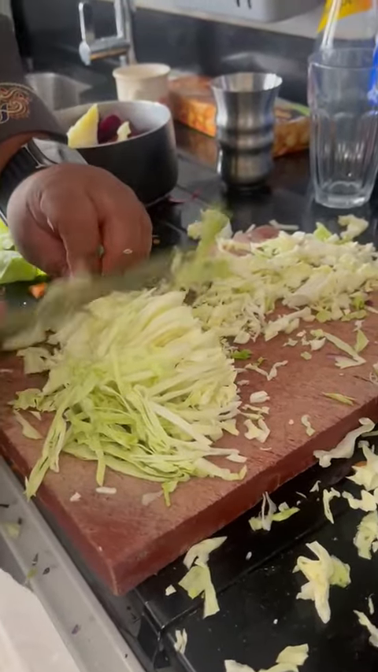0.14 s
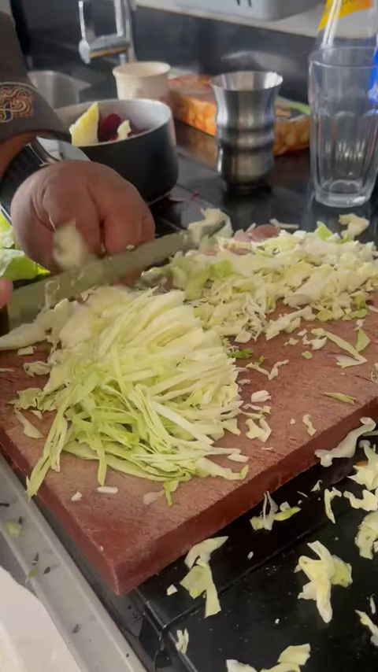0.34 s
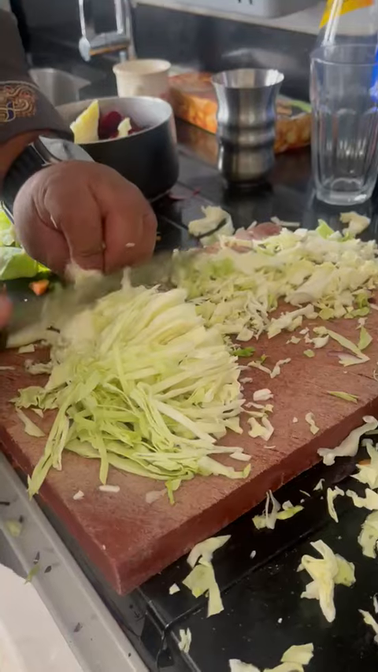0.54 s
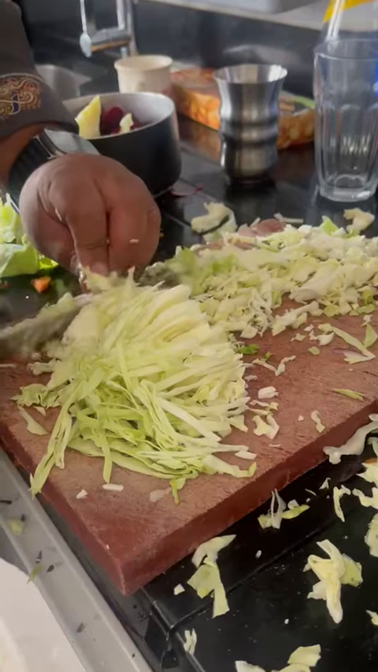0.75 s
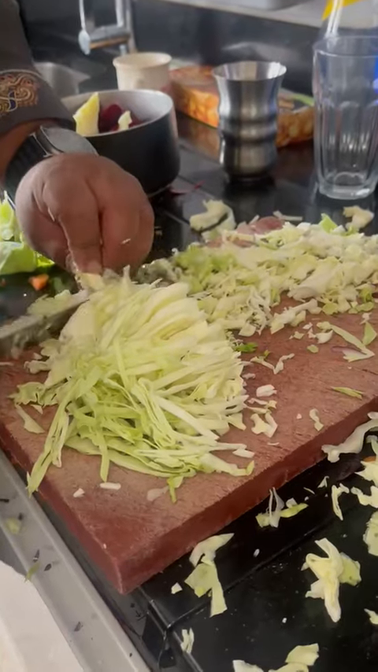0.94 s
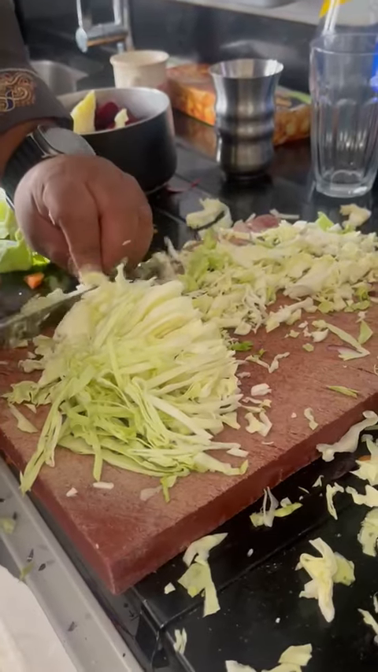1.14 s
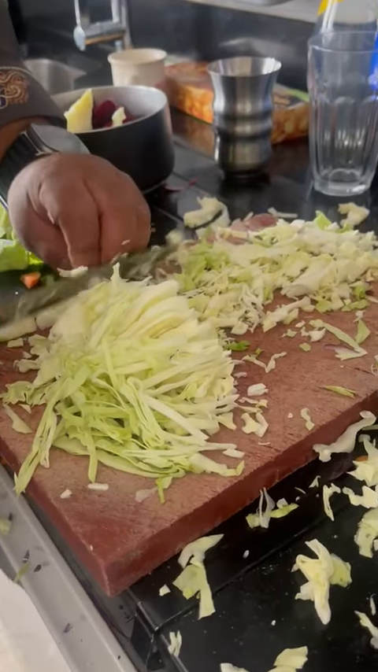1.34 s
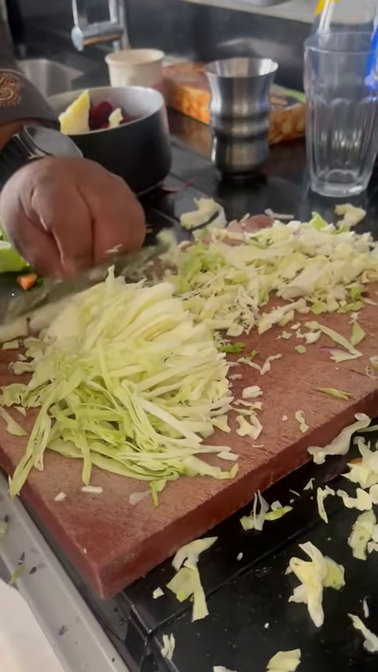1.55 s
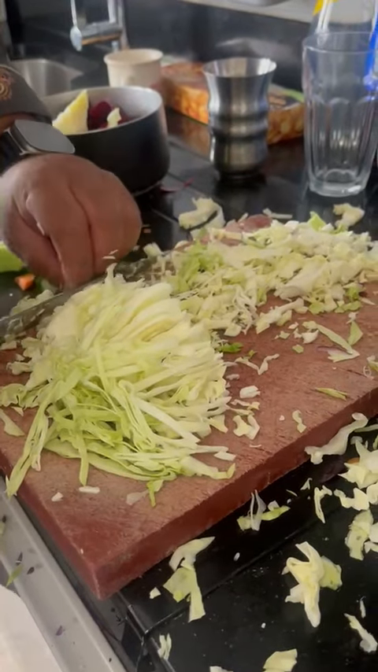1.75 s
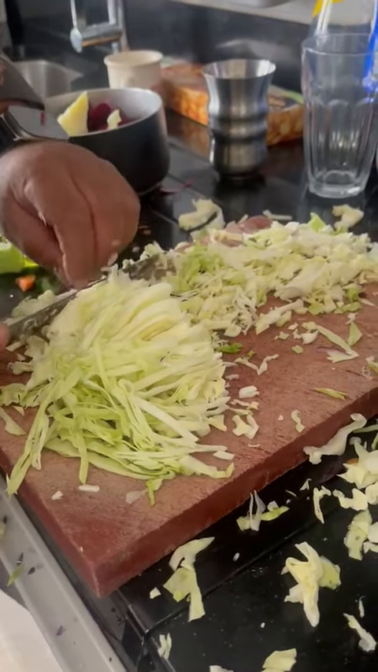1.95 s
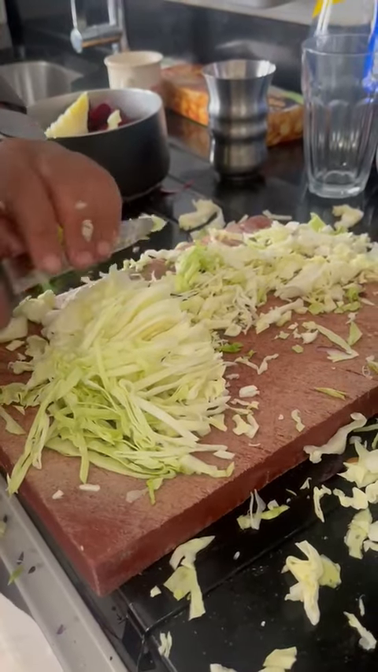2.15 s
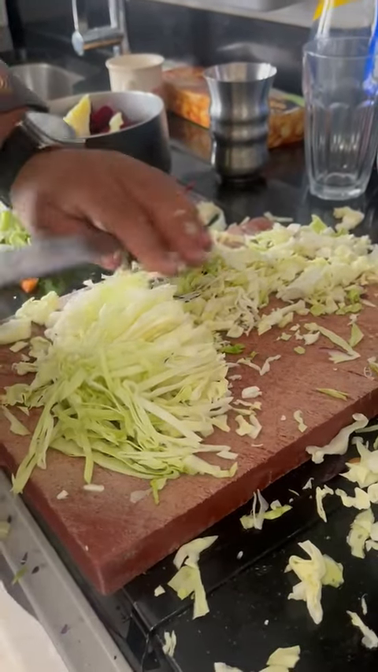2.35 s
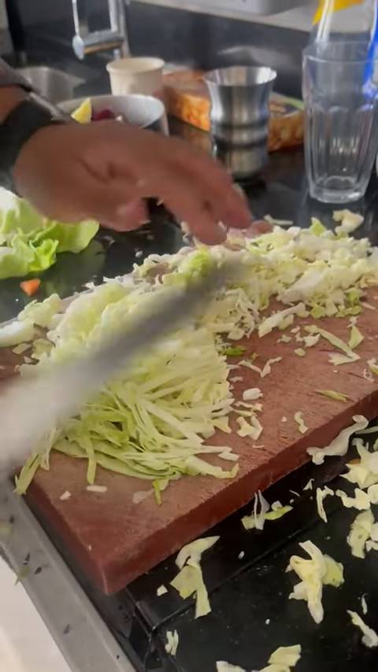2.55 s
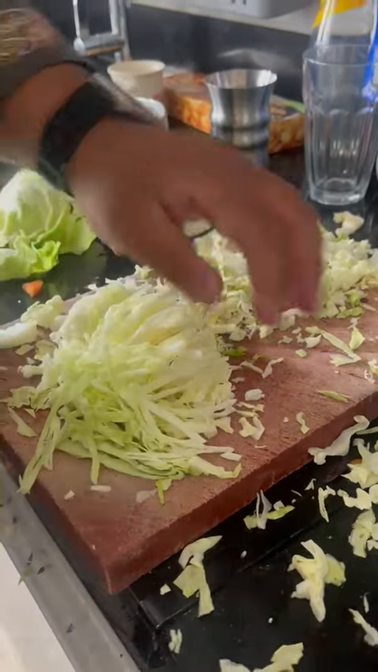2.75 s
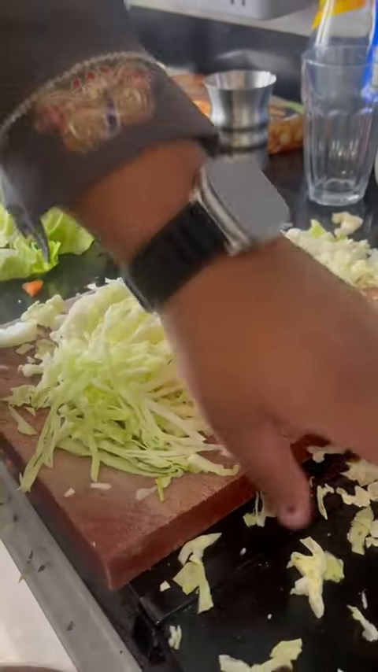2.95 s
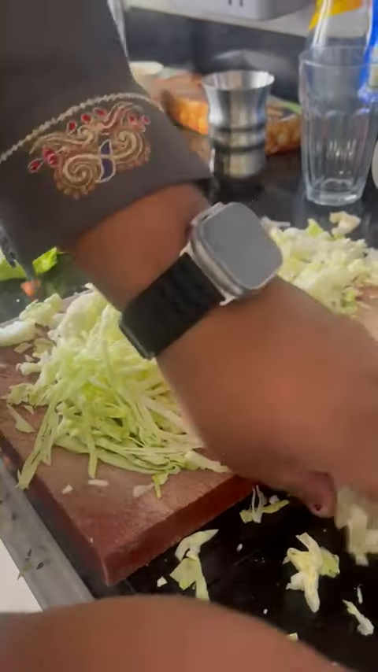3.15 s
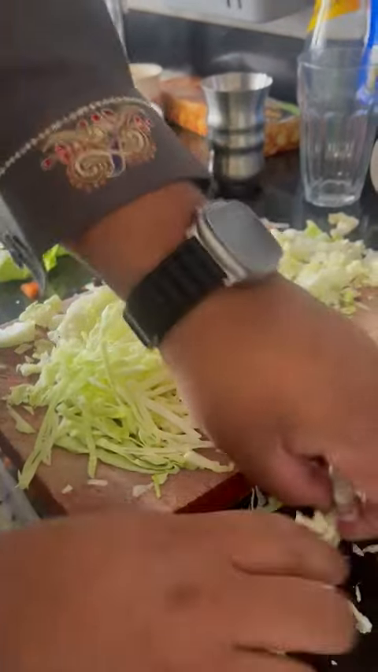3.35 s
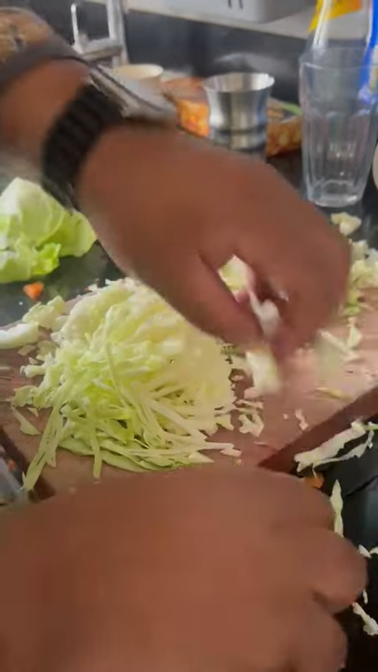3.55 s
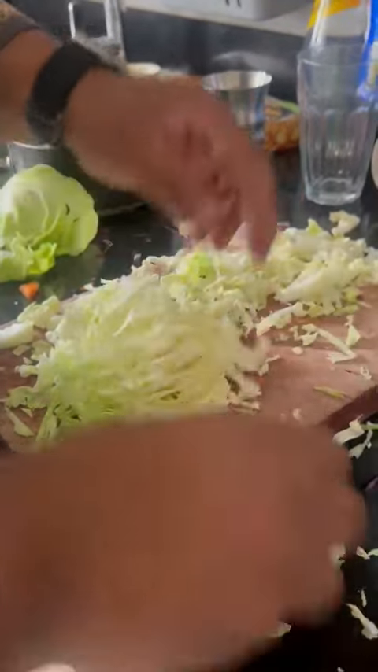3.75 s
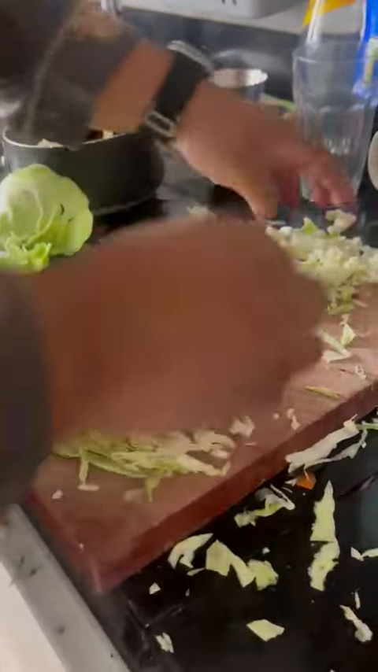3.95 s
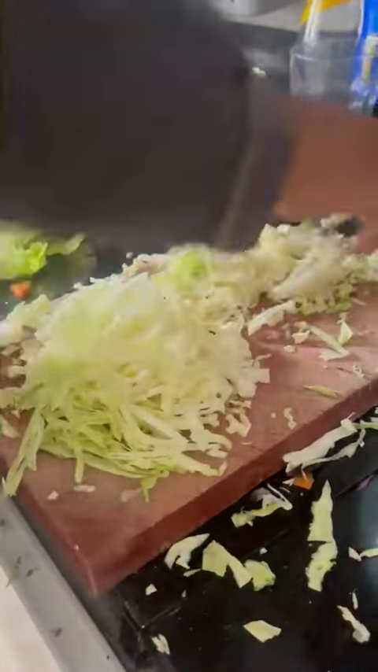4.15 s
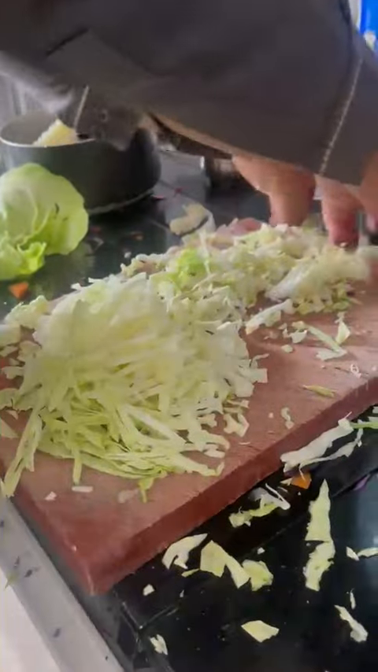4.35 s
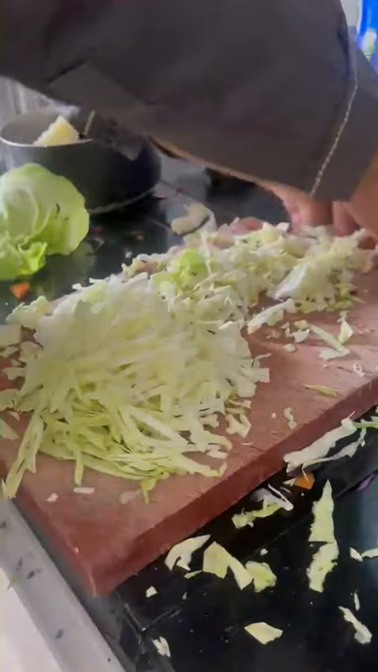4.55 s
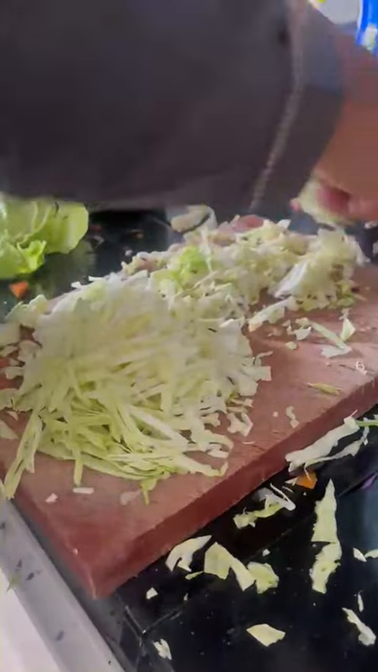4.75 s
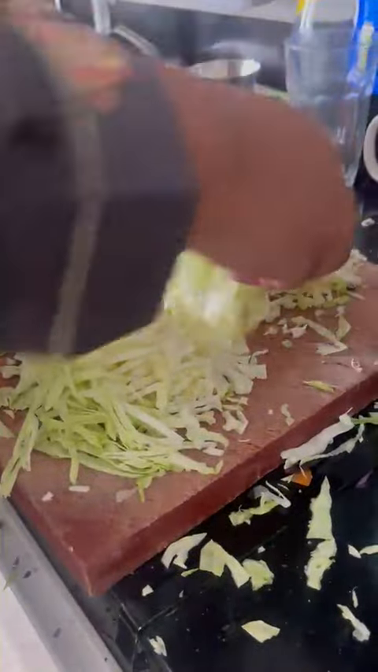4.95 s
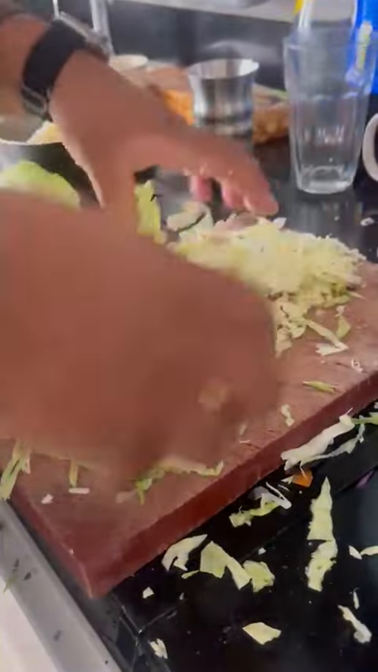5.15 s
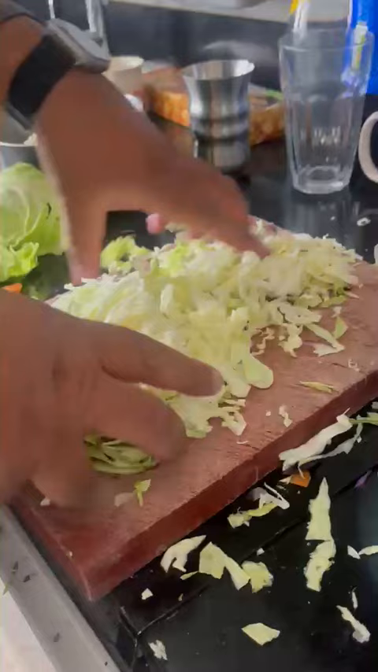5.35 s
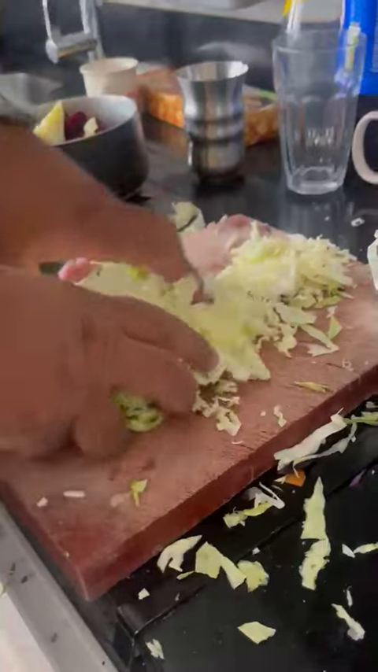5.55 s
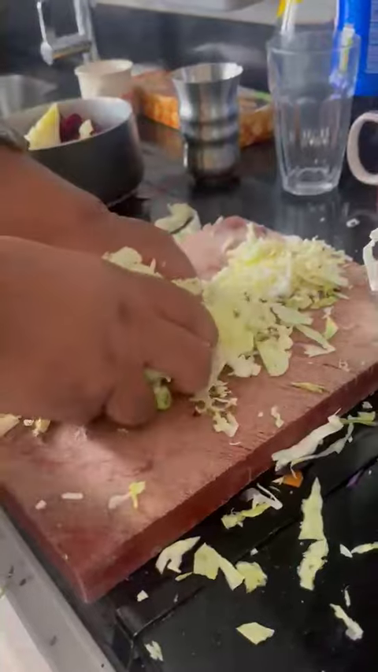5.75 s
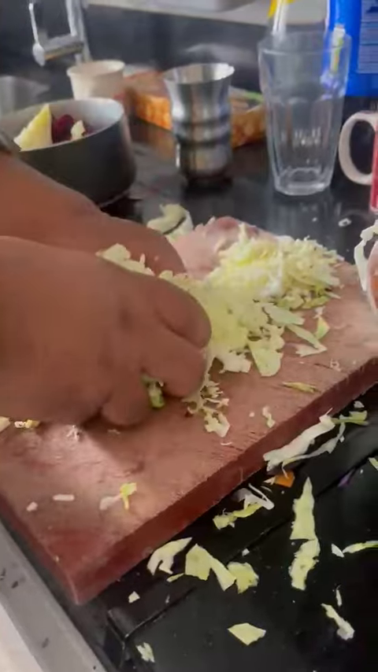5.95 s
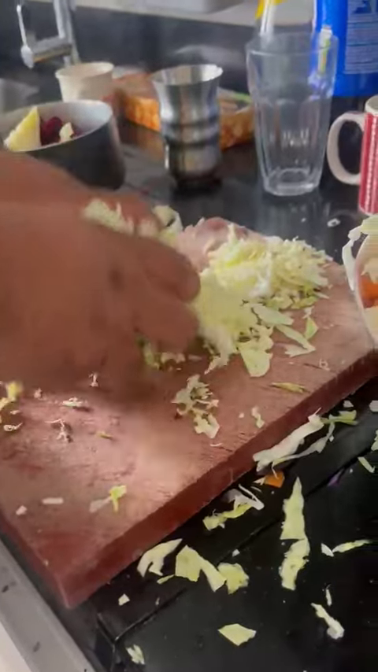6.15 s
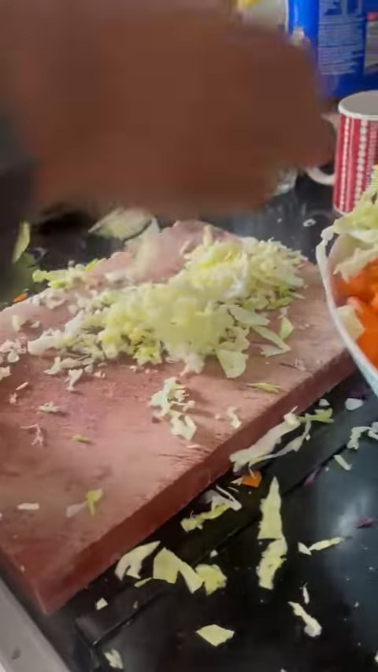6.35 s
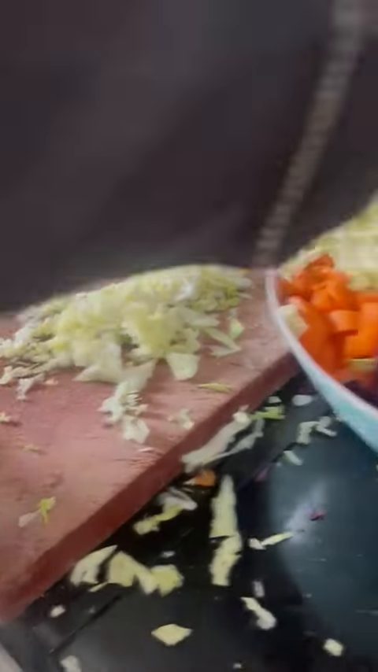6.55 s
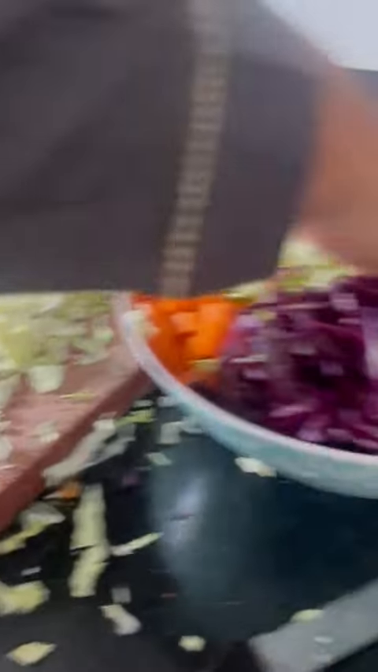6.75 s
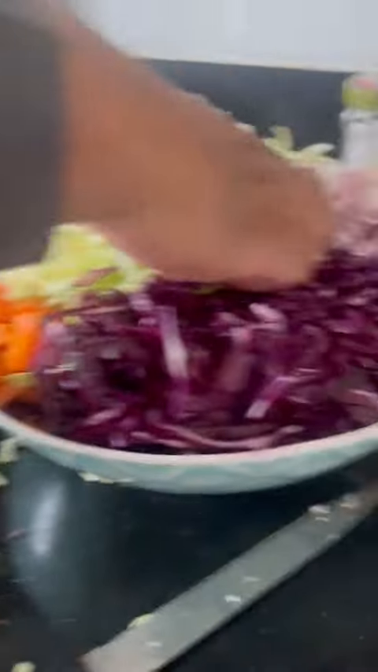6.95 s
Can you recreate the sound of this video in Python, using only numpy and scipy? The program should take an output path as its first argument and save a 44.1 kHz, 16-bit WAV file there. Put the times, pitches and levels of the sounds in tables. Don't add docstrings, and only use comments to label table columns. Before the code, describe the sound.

Crisp cabbage slicing with woody knocks at a steady pace, then a knife clatters on a stone counter and hands rustle through the shreds.

```python
import sys
import numpy as np
from scipy import signal
from scipy.fft import rfft, irfft
from scipy.io import wavfile
from scipy.ndimage import uniform_filter1d

SR = 44100
rng = np.random.default_rng(int(sys.argv[2]) if len(sys.argv) > 2 else 0)


def nominal_scale(level):
    x = np.asarray(level, float) / 20
    return 10 ** x


def generate_wav(sig):
    pcm = np.round(np.clip(np.atleast_2d(sig).T, -1, 1) * 32767).astype(np.int16)
    wavfile.write(sys.argv[1], SR, pcm)


N = 308700
T = np.arange(N) / SR
PADDED = N + 8192
HZ = np.maximum(np.arange(PADDED // 2 + 1) * SR / PADDED, 1)
BEND_S = 0.012

# frequency in Hz, level in dB, t60 in seconds.
BOARD = [(113.4, -20.5, 0.64), (160, -11.5, 0.21), (217, -15, 0.32), (262, -2, 0.2), (290, -10, 0.18),
         (348.2, 0, 0.12), (383, -4.5, 0.061), (465, 6, 0.036), (525, 0, 0.03), (596, -4.5, 0.037),
         (641, -11.5, 0.047), (736, -11, 0.074), (888, -10, 0.015), (1073, -13.5, 0.067),
         (1266, -12, 0.034), (1426, -6, 0.032), (1474, -5.5, 0.017), (1813, -17, 0.023),
         (2200, -15.5, 0.016), (2510, -15.5, 0.014)]


def unit(x):
    return x / np.sqrt(np.mean(x ** 2) + 1e-18)


def along(table, hz=HZ):
    f, v = np.transpose(table)
    return np.interp(np.log(hz), np.log(np.maximum(f, 1)), v)


def colour(x, table):
    return irfft(rfft(x, PADDED) * nominal_scale(along(table)), PADDED)[:N]


def band(x, lo_hz, hi_hz):
    edges = [lo_hz, min(hi_hz, .45 * SR)]
    return signal.sosfilt(signal.butter(2, edges, "band", fs=SR, output="sos"), x)


def band_twice(x, lo_hz, hi_hz):
    return band(band(x, lo_hz, hi_hz), lo_hz, hi_hz)


def curves(spans):
    s, *columns = np.concatenate(spans).T
    return [np.interp(T, s, c) for c in columns]


def walk(rate):
    k = int(SR / rate)
    steps = np.repeat(rng.standard_normal(N // k + 1), k)
    return unit(uniform_filter1d(uniform_filter1d(steps, k), k)[:N])


def add(out, s, x, db):
    i = int(s * SR)
    x = (x * nominal_scale(db) / np.abs(x).max())[max(-i, 0):N - i]
    out[max(i, 0):max(i, 0) + len(x)] += x


def fade(t60, size=4096):
    return np.exp(-np.log(1000) * np.arange(size) / (max(t60, .001) * SR))


def ring(modes, stretch=1., scatter_db=2.5, bend_s=0., size=16384):
    t = np.arange(size) / SR
    chance = rng.standard_normal((len(modes), 2))
    out = np.zeros(size)
    for k, ((hz, db, t60), (a, b)) in enumerate(zip(modes, chance)):
        swell = 1 - np.exp(-t / (bend_s * (250 / hz) ** 3 + 1e-5))
        tone = np.sin(2 * np.pi * hz * (1 + 0.014 * b) * t) * fade(t60 * stretch, size=size)
        out += (-1) ** k * nominal_scale(db + scatter_db * a) * tone * swell
    return out


def grains(rate, spread_db, smear_s):
    size = (rng.random(N) < rate / SR) * nominal_scale(spread_db * rng.exponential(size=N))
    return unit(signal.lfilter([1], [1, -np.exp(-1 / (smear_s * SR))], size) * rng.standard_normal(N))


def wood(x):
    body = ring(BOARD, stretch=.45, scatter_db=1.0)
    return unit(band(signal.fftconvolve(x, body)[:N], 240, 3000))


def cuts():
    # bite in seconds, time to land in seconds, crunch in dB, load on the board in dB, thick ribs in dB.
    strokes = [
        (-0.06, 0.0098, -17.5, -6, 0),
        (0.167, 0.046, -29, -14, 4.5),
        (0.409, 0.039, -29, -3.5, 0.5),
        (0.643, 0.049, -29.5, -7, 1.5),
        (0.886, 0.054, -33, -10.5, 2),
        (1.116, 0.058, -34.5, -2, -6),
        (1.363, 0.044, -36.5, -8.5, -7),
        (1.568, 0.053, -39.5, -1.5, -4),
        (1.81, 0.032, -43, 1, -8),
    ]
    # frequency in Hz, level in dB per Hz.
    leaf_spectrum = [(530, -76), (900, -29), (1940, -20), (3230, -15.5), (5320, -13.5), (6390, -13.5),
                     (8980, -1.5), (11900, -6), (13700, -13), (15700, -21), (16500, -50)]
    bite_s, let_go_s = 0.0043, 0.022
    cut, load, settle, thick = np.zeros((4, N))
    for s, length, db, load_db, ribs_db in strokes:
        at = s + np.array([0, bite_s, 0.84 * length, length, length + let_go_s, length + 3 * let_go_s])
        stroke = nominal_scale(db + np.interp(T, at, [-30, -13.5, 0, -3.5, -26, -60], left=-200, right=-200))
        cut = cut + stroke
        load = load + stroke * nominal_scale(load_db)
        thick = thick + stroke * nominal_scale(ribs_db)
        landed = s + length
        settle = settle + (T > landed) * nominal_scale(db - 19.5 - 122 * np.maximum(T - landed, 0))
    burst = grains(rate=1800, spread_db=2.4, smear_s=.0009)
    layers = [(500, 3800), (3800, 6500), (6500, 16500)]
    crisp = sum(band(grains(rate=1600, spread_db=3.3, smear_s=.0016), *edges) for edges in layers)
    crisp = unit(colour(unit(crisp) + .5 * burst, leaf_spectrum)) * nominal_scale(5.5)
    dull = unit(band(grains(rate=6400, spread_db=-2.5, smear_s=0.0022), 900, 3400))
    ribs = unit(band_twice(grains(rate=1000, spread_db=2.4, smear_s=.003), 2700, 6800))
    leaves = (cut + settle) * crisp + nominal_scale(-3.5) * thick * ribs
    flesh = (nominal_scale(-14) * cut + nominal_scale(1) * settle) * dull
    return leaves + flesh + (load + nominal_scale(15) * settle) * wood(burst)


def chops():
    # start in seconds, peak in dB, edge brightness in dB, ring stretch (ratio),
    # counter shiver in dB.
    blows = [
        (-0.011, -4.5, 3, 0.38, -0.5),
        (0.218, -5, -3.5, 0.34, -0.5),
        (0.452, -7.5, -4.5, 0.45, 0),
        (0.699, -4.5, -3, 0.41, -1),
        (0.937, -8.5, -7, 0.49, -2),
        (1.173, -17, -8, 0.51, -3),
        (1.418, -10.5, -5.5, 0.51, -7),
        (1.839, -22.5, -20, 0.52, -8),
    ]
    # frequency in Hz, level in dB, t60 in seconds.
    counter_hum = [(1048, -37, 0.2), (1386, -49, 0.3), (1430, -47, 0.3), (1495, -45, 0.4),
                   (1560, -44, 0.38)]
    tick_modes = [(1897, -0.5, .014), (2296, -0.5, 0.018), (2560, -3.5, .012)]  # Hz, dB, t60 s
    out = np.zeros(N)
    for s, db, edge_db, stretch, shiver_db in blows:
        modes = [(hz, g + (edge_db + 12.0) * (hz > 700) + shiver_db * (1350 < hz < 1600), t60)
                 for hz, g, t60 in BOARD + counter_hum]
        heel_then_tip = np.r_[1, np.zeros(int(.0021 * SR)), .6]
        push = np.convolve(np.hanning(int(.00025 * SR) + 3), heel_then_tip)
        knock = ring(modes, stretch, scatter_db=2.0, bend_s=BEND_S)
        add(out, s + 0.001816, np.convolve(knock, push), db)
        add(out, s + 0.002113, band(rng.standard_normal(4096) * fade(0.08), 260, 620), db - 14)
        add(out, s + 0.001983, band(rng.standard_normal(4096) * fade(0.01), 580, 2300), db + edge_db - 6)
        shiver = band_twice(rng.standard_normal(16384), 1330, 1620)
        add(out, s + 0.008, shiver * fade(0.98, size=16384), db + edge_db + shiver_db - 31.5)
        add(out, s + 0.00219, ring(tick_modes, size=4096), db + edge_db - 8)
        add(out, s + 0.002, band(rng.standard_normal(4096) * fade(0.0083), 1900, 6500), db + edge_db - 11.5)
    return out


def kitchen():
    # frequency in Hz, level in dB.
    mains = [(50, -50), (100, -71.5), (150, -67.5), (200, -80.5), (300, -66)]
    # frequency in Hz, level in dB per Hz.
    air_spectrum = [(35, -22), (60, -9), (80, -13), (110, -18.5), (170, -17), (280, -16.5), (480, -21.5),
                    (800, -22), (1200, -44), (3000, -40.5), (6000, -43), (9000, -46.5), (12000, -65)]
    hum = np.zeros(N)
    for hz, db in mains:
        level = np.sqrt(2) * nominal_scale(db + 0.75 * walk(5.3))
        hum += level * np.sin(2 * np.pi * (hz * T + rng.random()))
    fan_hz, fan_width_hz = 107, 14.7
    fan = unit(band(rng.standard_normal(N), fan_hz - fan_width_hz / 2, fan_hz + fan_width_hz / 2))
    fan = unit(fan / np.sqrt(uniform_filter1d(fan ** 2, size=8000))) * nominal_scale(-56.5)
    air = colour(rng.standard_normal(N), air_spectrum)
    air = air / np.std(band(air, 130, 14000))
    return hum + fan + air * nominal_scale(-59.5 + .8 * walk(4))


def snaps():
    # start in seconds, peak in dB, centre in Hz.
    snapping = [(0.098, -23.5, 4920), (0.141, -18.5, 5020), (0.164, -14.5, 9420), (0.176, -19.5, 7800),
                (0.2535, -37.5, 5080), (0.2634, -29.5, 7800), (0.3336, -20.5, 8630), (0.36, -20, 8830),
                (0.414, -16, 8840), (0.5404, -22, 7600), (0.5521, -14.5, 4100), (0.573, -22, 4780),
                (0.586, -12, 4900), (0.646, -22, 9000), (0.73, -32, 9030), (0.8975, -14.5, 8410),
                (0.92, -16, 5000), (0.2, -16.5, 5000), (0.666, -17, 6030), (1.1263, -15.5, 7400),
                (1.151, -6.5, 7600), (1.3653, -24.5, 7830), (1.385, -13, 6500), (1.352, -41, 7500),
                (1.8646, -25, 9500), (1.91, -23.5, 8340)]
    # start in seconds, peak in dB.
    dropping = [(3.7, -28), (3.726, -33), (3.748, -38), (3.871, -37.5), (4.288, -20), (4.346, -24),
                (4.5587, -22.5), (4.5912, -19), (4.6198, -16), (4.7593, -23), (5.18, -25), (5.306, -18.5),
                (5.52, -41), (5.558, -25), (5.6, -15), (5.6108, -16), (5.7482, -14), (5.69, -25),
                (5.761, -28), (5.781, -21), (5.801, -24), (5.838, -32), (5.866, -22), (5.893, -26),
                (5.974, -25), (6.014, -27), (6.1675, -19), (6.17, -16.5), (6.29, -30), (6.327, -28),
                (6.741, -26)]
    out = np.zeros(N)
    ticks = [row + (0.022,) for row in snapping]
    ticks += [row + (8600, 0.027) for row in dropping]
    for s, db, hz, t60 in ticks:
        puff = rng.standard_normal(4096) * fade(t60)
        bright = band(puff, hz * 0.75, min(hz * 2.5, 12500))
        fleshy = band(puff, hz * .15, hz * .7)
        add(out, s, bright + nominal_scale(-14) * fleshy, db - 8.5)
    return out


def thuds():
    # start in seconds, peak in dB, frequency in Hz, t60 in seconds.
    landings = [(0.23, -31.5, 100.4, 0.32), (1.189, -31, 105.4, 0.19), (1.431, -36.5, 62.6, .2),
                (1.875, -36, 106.4, 0.21), (3.46, -42.5, 190, .1), (1.859, -24.5, 217, 0.049),
                (3.165, -34.5, 107.5, 0.19), (3.239, -34, 160, 0.12), (4.093, -31.5, 210, 0.052),
                (4.348, -40, 146.5, 0.26), (5.094, -42, 67, 0.2), (5.52, -38, 68.3, 0.32)]
    out = np.zeros(N)
    for s, db, hz, t60 in landings:
        add(out, s, ring([(hz, 0, t60), (1.6 * hz, -4, t60)], bend_s=0.00033), db + 0.5)
    return out


def bumps():
    # start in seconds, peak in dB, frequency in Hz.
    pushes = [(1.603, -30, 344), (1.386, -33.5, 480), (1.398, -27.5, 477), (1.407, -32, 480),
              (1.84, -25.5, 467), (1.852, -43, 450), (3.699, -46, 504), (3.742, -46, 513),
              (3.794, -42.5, 505), (4.011, -38.5, 480), (4.086, -35, 430), (4.312, -32.5, 470),
              (4.33, -27, 467), (4.94, -51, 480), (4.99, -52, 480), (5.087, -42.5, 263), (5.101, -47, 490),
              (5.33, -42.5, 400), (5.471, -38.5, 422), (5.518, -35, 487), (5.6, -41, 420),
              (5.54, -39.5, 480), (5.64, -43, 398), (5.672, -38, 430), (5.686, -42, 450), (5.72, -43, 450),
              (5.863, -48, 480), (5.75, -45, 700), (6.02, -48.5, 750), (6.282, -48, 452), (6.926, -56, 560)]
    out = np.zeros(N)
    soft = np.hanning(int(.001 * SR))
    for s, db, hz in pushes:
        knock = ring(BOARD, stretch=.5, bend_s=BEND_S)
        add(out, s, band(np.convolve(knock, soft), hz * 0.8, hz * 1.28), db)
    return out


def sings():
    # start in seconds, frequency in Hz, peak in dB, t60 in seconds.
    notes_of_blade = [(2.7381, 1520, -21.5, 0.031), (2.7381, 4240, -20.5, 0.03), (2.7325, 4000, -19, 0.013),
                      (2.7325, 2290, -24, .02), (2.7325, 1400, -24.5, .015), (2.7381, 1940, -27, 0.031),
                      (2.7381, 3470, -27.5, .04), (2.7325, 950, -31, 0.021), (3.0265, 2070, -30.5, 0.04),
                      (3.031, 4900, -25.5, 0.028), (3.0265, 1300, -35.5, .04), (3.0265, 1600, -36.5, .04),
                      (3.0265, 624, -39.5, 0.043), (3.8, 431, -40, 0.046), (3.1679, 2786, -10.5, 0.03),
                      (3.1665, 580, -19.5, 0.03), (3.1665, 332, -24, .03), (3.1665, 716, -23.5, 0.027),
                      (3.1665, 1249, -23.5, 0.028), (3.1605, 1550, -24, 0.05), (3.18, 2070, -29.5, 0.034),
                      (3.167, 3690, -17.5, 0.02), (3.0265, 1357, -37, 0.098), (3.031, 7800, -22.5, .03),
                      (3.2195, 6900, -29.5, .05), (3.196, 950, -32.5, .04), (3.243, 2200, -33, .03),
                      (3.259, 700, -27, .03), (3.259, 2300, -30, .03), (3.243, 8370, -11, 0.028),
                      (3.2605, 7600, -25, .06), (3.2605, 3800, -25, 0.043), (2.737, 5900, -29, .02),
                      (2.737, 8270, -28, .02), (3.103, 4400, -37, .04), (3.18, 6900, -26, .05),
                      (3.374, 1280, -39, .08), (3.258, 2790, -26, 0.035), (3.373, 1990, -33.5, 0.028),
                      (3.38, 780, -39, 0.045), (3.374, 500, -40, .08), (3.405, 700, -41, 0.093),
                      (3.435, 1230, -41.5, .09), (1.842, 960, -36.5, 0.026), (1.423, 1080, -24.5, 0.044),
                      (4.009, 3300, -43, .03), (4.009, 1610, -43, 0.033), (4.335, 1750, -49, .04),
                      (4.59, 3600, -45, .03), (4.617, 3550, -47.5, 0.037)]
    out = np.zeros(N)
    near = [(1, 0), (1.03, -6), (.96, -8)]
    for s, hz, db, t60 in notes_of_blade:
        add(out, s, ring([(hz * k, g, t60) for k, g in near], scatter_db=5.5, size=4096), db)
    return out


def hands():
    # time in seconds, motion in dB,
    # pressure on the board in dB.
    wiping = [(1.66, -53.5, -74), (1.93, -62, -54.5), (2.1, -74.5, -87), (2.36, -62, -61),
              (2.72, -71.5, -61), (2.8, -55.5, -55), (2.97, -70, -56.5), (3.15, -60, -53.5),
              (3.26, -47.5, -43), (3.35, -52.5, -53.5), (3.5, -60, -48.5)]
    # time in seconds, motion in dB, pressure on the board in dB.
    gathering = [(3.62, -67, -54.5), (3.8, -68.5, -65), (3.99, -75, -60), (4.02, -65, -52), (4.2, -54, -60),
                 (4.31, -45.5, -62), (4.43, -61.5, -56.5), (4.52, -45.5, -55.5), (4.72, -53.5, -64),
                 (5.0, -61, -60), (5.33, -58, -57), (5.47, -52.5, -54.5), (5.65, -43, -48.5),
                 (5.9, -52, -56.5), (6.04, -44, -54), (6.11, -50.5, -58.5), (6.201, -61, -64.5),
                 (6.33, -59.5, -64.5), (6.45, -56, -63.5), (6.79, -48.5, -54.5), (7.0, -59.5, -60)]
    # frequency in Hz, level in dB per Hz.
    rustle_spectrum = [(1470, -39.5), (2500, -21), (7260, -13.5), (8840, -7), (10300, 1), (11200, -13),
                       (12600, -16.5), (13700, -28), (15700, -28.5), (16500, -74)]
    motion_db, press_db = curves([wiping, gathering])
    motion_db = motion_db + 2 * walk(9)
    on = np.clip((T - 1.64) / .05, 0, 1)
    rustle = unit(colour(grains(rate=2000, spread_db=2.9, smear_s=.002), rustle_spectrum))
    rub = unit(band(grains(rate=2500, spread_db=2.5, smear_s=0.0044), 550, 3430))
    rumble = unit(band(wood(grains(rate=700, spread_db=-17.0, smear_s=0.017)), 160, 1000))
    flicker = [nominal_scale(1.3 * walk(40)) for _ in range(3)]
    rub_db = -1.5 + 0.15 * motion_db + 0.85 * press_db
    crackle = rustle * nominal_scale(motion_db + 5.5) * flicker[0]
    skin = rub * nominal_scale(rub_db) * flicker[1]
    return on * (crackle + skin + rumble * nominal_scale(press_db - 5) * flicker[2])


def drags():
    # start in seconds, length in seconds, frequency in Hz, level in dB.
    skids = [(3.39, 0.06, 220, -50.5), (4.43, 0.11, 1450, -59), (5.5, .05, 1500, -62),
             (4.43, .07, 2000, -62), (4.5, .06, 3700, -58), (1.87, .075, 2500, -60.5),
             (5.03, 0.24, 2200, -60.5), (4.97, 0.065, 1650, -63.5), (2.3, 0.18, 800, -65),
             (5.41, 0.09, 1530, -58), (6.36, 0.12, 910, -62), (6.77, 0.03, 1190, -55),
             (6.8, .05, 1550, -58), (6.8, 0.037, 590, -56), (5.42, 0.14, 488, -50.5), (5.58, .16, 430, -52),
             (6.91, 0.09, 560, -57.5), (4.21, 0.11, 3270, -61.5), (5.57, 0.21, 4200, -54),
             (5.8, .12, 4500, -59), (5.98, .1, 5200, -54), (5.18, .1, 1700, -66)]
    # start in seconds,
    # length in seconds, frequency in Hz, level in dB.
    chatter = [(3.17, 0.12, 2500, -47.5), (3.17, .08, 1200, -44.5), (3.17, 0.07, 450, -43),
               (3.26, .05, 550, -46), (3.27, .07, 1100, -49), (3.375, .09, 1150, -49),
               (3.38, .1, 550, -49.5), (2.745, .12, 4800, -53), (3.03, 0.092, 600, -55.5),
               (2.5, .3, 1600, -71)]
    rough = grains(rate=1200, spread_db=2.0, smear_s=.003)
    rows = [row + (1.22,) for row in skids] + [row + (1.6,) for row in chatter]
    out = np.zeros(N)
    for s, length, hz, db, wide in rows:
        scrape = unit(band_twice(rough, hz / wide, hz * wide))
        easing = nominal_scale(db - 2.2 * np.clip((T - s) / length, 0, 1))
        touching = uniform_filter1d(1. * ((T > s) & (T < s + length)), size=600)
        out += scrape * easing * touching
    return out


def clacks():
    # start in seconds, peak in dB, clack in dB, 2-5 kHz level in dB, t60 in seconds.
    contacts = [(2.7317, -7, -42, -29.5, 0.0092), (2.7372, -13, -30.5, -25.5, 0.04),
                (2.7408, -19, -40, -38, 0.02), (3.0256, -0.5, -45, -29.5, 0.0066),
                (3.0301, -9, -38, -67, 0.032), (3.0607, -25.5, -54.5, -45, 0.012),
                (3.0643, -22, -43, -57, 0.036), (3.0867, -19.5, -58.5, -38, 0.017),
                (3.104, -23, -58, -45.5, 0.02), (3.159, -35, -24, -29, 0.042),
                (3.165, -5.5, -23, -13.5, 0.033), (3.179, -2.5, -38.5, -25, 0.013),
                (3.2174, -6.5, -35.5, -49, 0.024), (3.242, 0, -30.5, -45, 0.029),
                (3.2584, -10, -27.5, -17.5, 0.043), (3.316, -19.5, -58, -54, 0.043),
                (3.3727, -56.5, -34.5, -38, 0.14), (3.434, -26.5, -52, -52, 0.019),
                (3.4515, -32.5, -60.5, -58, .015), (3.486, -11.5, -52, -37, 0.058),
                (3.4948, -21.5, -48, -43, 0.027), (3.5703, -24, -54, -66, 0.031),
                (3.6427, -26, -65.5, -76, 0.039), (3.6516, -23, -54, -46, 0.025),
                (4.008, -51, -50.5, -50, 0.04), (6.1663, -46, -51, -40, 0.045)]
    # frequency in Hz, level in dB, t60 in seconds.
    knife = [(1348, -8, 0.055), (2070, -5.5, 0.024), (2876, -9, .04), (3580, -4, 0.034), (3820, -4, .035),
             (4200, -4, 0.03), (4900, -0.5, 0.041), (5400, -4.5, 0.017), (6200, -2, 0.018),
             (6500, -5.5, 0.037), (7070, -8.5, 0.065), (7800, 1.5, 0.027), (8460, -2.5, 0.038),
             (9070, 8.5, 0.023)]
    clack_hz, skid_s = 1220, 0.00049
    out = np.zeros(N)
    for s, db, low_db, mid_db, t60 in contacts:
        s = s + 0.0007
        grit = rng.standard_normal(4096) * fade(t60) * (1 - fade(skid_s * np.log(1000)))
        steel = ring(knife, stretch=min(t60 / .04, 1.2), scatter_db=3.0, size=4096)
        crack = unit(signal.fftconvolve(grit * fade(0.007), steel)[:4096]) + nominal_scale(8.5) * unit(grit)
        crack = crack * np.hanning(8192)[4096:]
        add(out, s, band(crack, 5520, 12730), db - 1)
        add(out, s, band(grit, 8700, 16500), db - 15.5)
        add(out, s, band(crack, 1700, 6700), mid_db + 9.5)
        clack = band(crack, clack_hz * 0.72, clack_hz * 2.04)
        add(out, s, band(clack, clack_hz * 0.54, clack_hz * 1.83), low_db + 6.5)
    return out


def room(x, late_s=0.0034, shift_s=.24):
    # centre in Hz, t60 in seconds, level in dB.
    walls = [(318.6, 0.37, -24.5), (1360, 0.58, -24), (4960, 0.63, -17.5), (10000, 0.17, -23)]
    wet = 0
    pose = (T + .1) // shift_s % 3
    for k in range(3):
        tail = np.zeros(SR)
        for hz, t60, db in walls:
            tail += nominal_scale(db) * unit(band(rng.standard_normal(SR), hz * 0.53, hz * 2.12) * fade(t60, size=SR))
        delayed = np.append(np.zeros(int(late_s * SR)), tail)
        wet = wet + signal.fftconvolve(x * (pose == k), delayed)[:N]
    return x + wet / np.sqrt(SR)


def ports(x):
    # frequency in Hz, lead in radians.
    lead = [(0, 0), (520, -0.1), (950, 1.2), (1720, -0.2), (3010, 0.8), (6720, 0.1), (7920, 0.7),
            (8870, -0.6), (11700, -6.0), (12700, -6.5), (13400, -9.3), (14200, -9.8), (14800, -12.6),
            (16400, -12.4)]
    # frequency in Hz, level difference in dB.
    tilt = [(60, 1.0), (110, 2), (200, 2), (380, -0.5), (700, 0), (1290, 1), (2380, 2), (4400, 4),
            (8120, 1), (15000, 0.0)]
    # frequency in Hz, level in dB.
    unshared = [(30, -25), (300, -23), (550, -13), (900, -9), (2000, -11), (5000, -9), (10000, -10.5),
                (16000, -8)]
    half = nominal_scale(along(tilt) / 2) * np.exp(.5j * along(lead))
    smear = rng.standard_normal(8192) * fade(0.16, size=8192)
    loose = rfft(smear / np.sqrt(np.sum(smear ** 2)), PADDED) * nominal_scale(along(unshared))
    return irfft(rfft(x, PADDED) * np.array([half + loose, 1 / half - loose]), PADDED)[:, :N]


def scene():
    hits = cuts() + chops() + snaps() + thuds() + bumps() + drags() + clacks()
    return ports(room(hits + sings()) + hands() + kitchen())


def roll_off(x):
    return signal.sosfilt(signal.butter(12, 16700, fs=SR, output="sos"), x)


def record(dry):
    # frequency in Hz, level in dB.
    mic_response = [(25, -28), (40, -2), (60, 1), (11500, -0.5), (12800, -14.5), (14000, -13), (16300, -20),
                    (16900, -60.5)]
    heard = np.array([colour(x, mic_response) for x in dry])
    return roll_off(np.tanh(heard * 0.77) / 0.82)


dry = scene()
out = record(dry)
generate_wav(out)
```